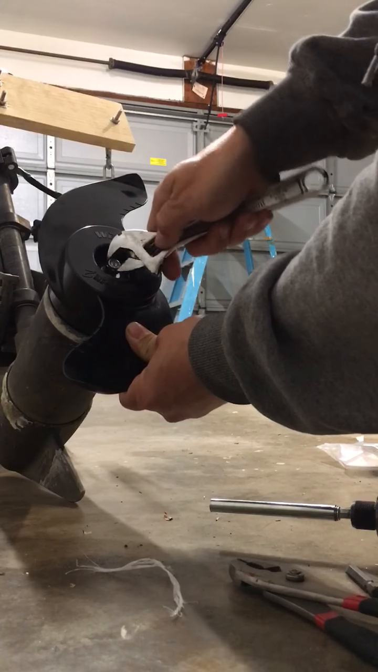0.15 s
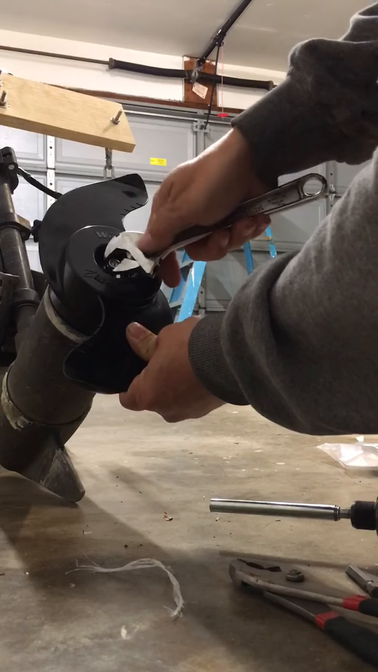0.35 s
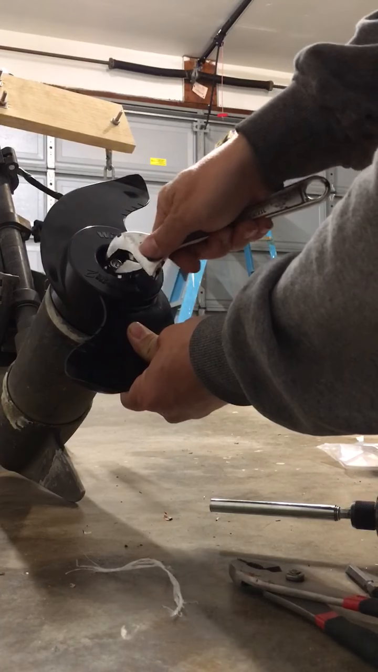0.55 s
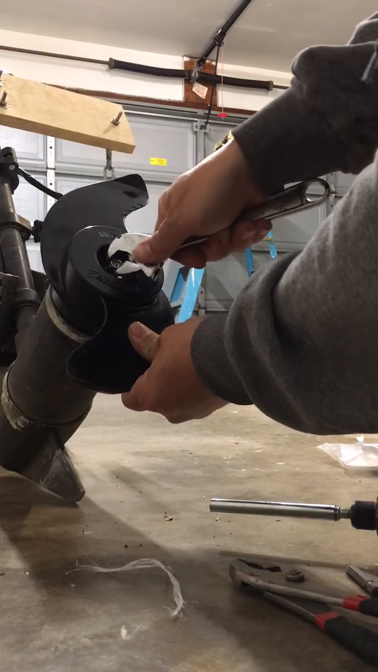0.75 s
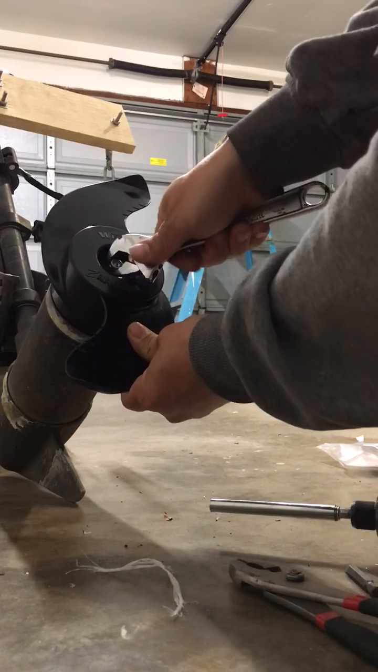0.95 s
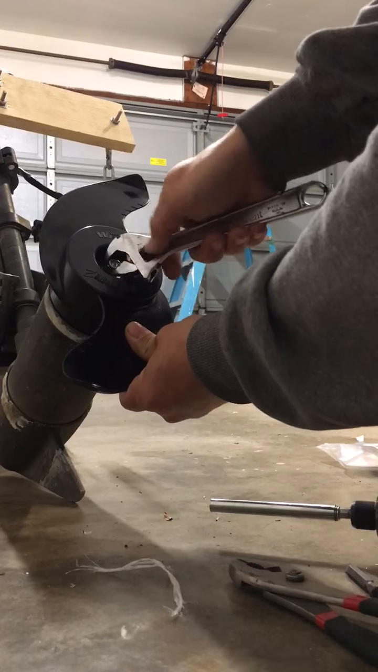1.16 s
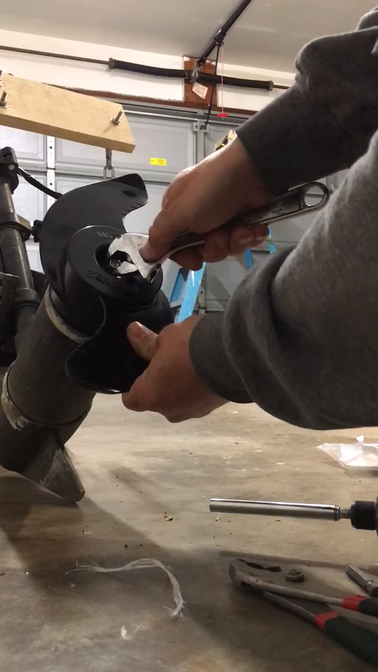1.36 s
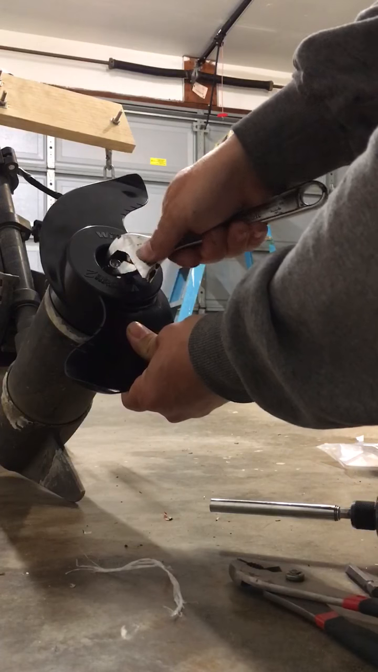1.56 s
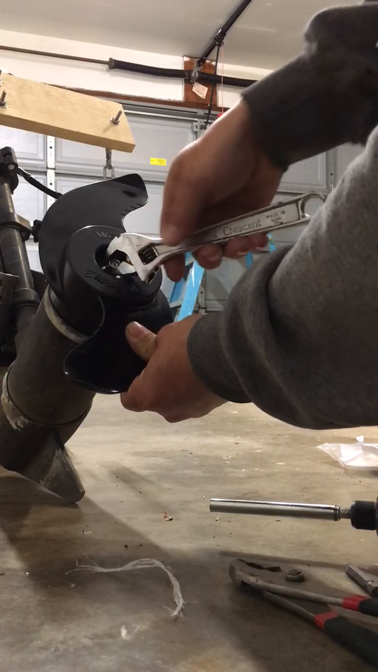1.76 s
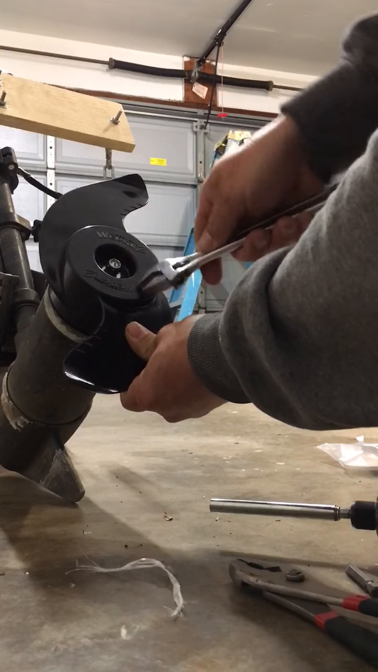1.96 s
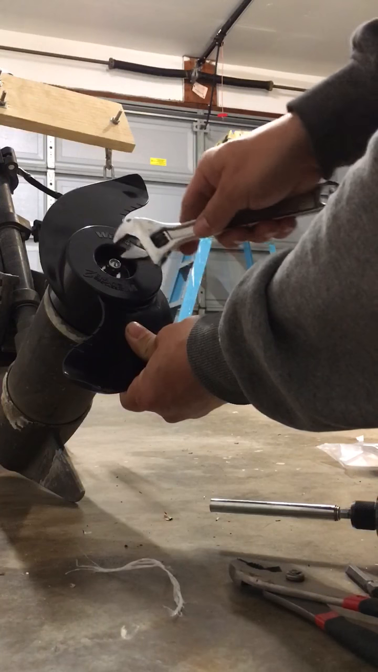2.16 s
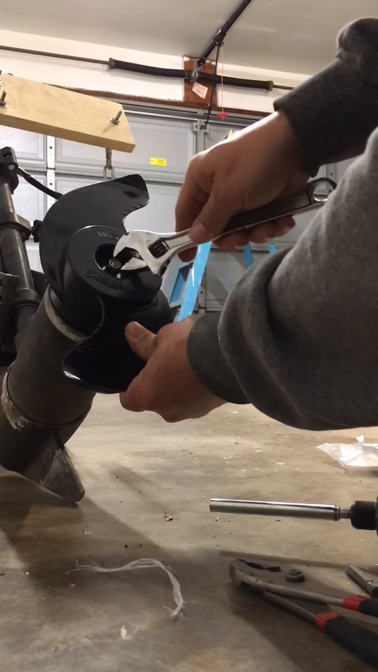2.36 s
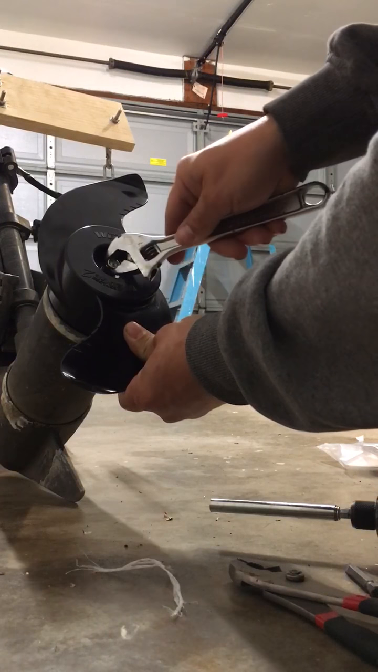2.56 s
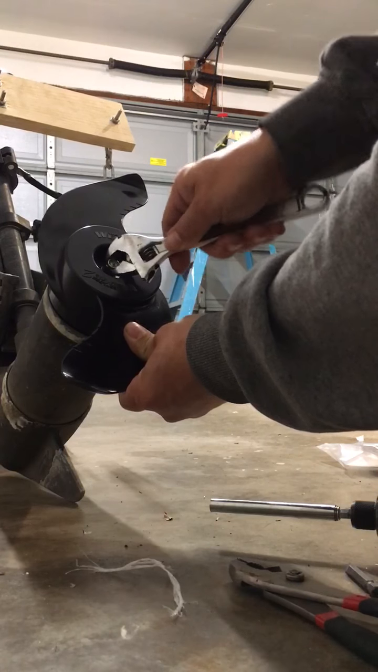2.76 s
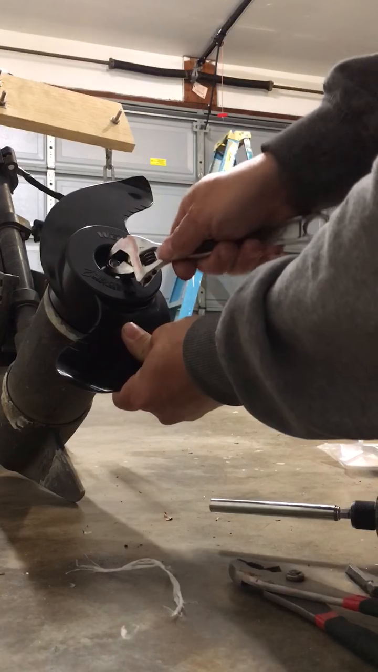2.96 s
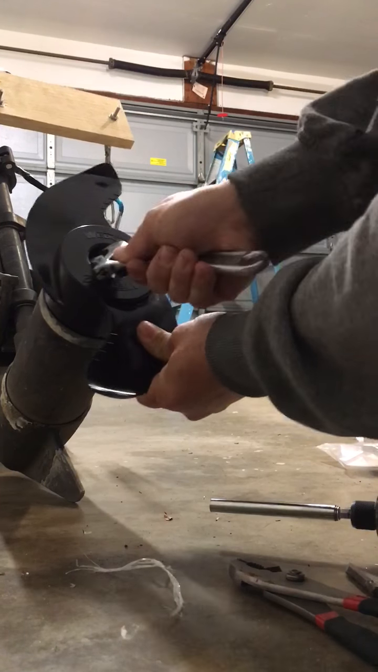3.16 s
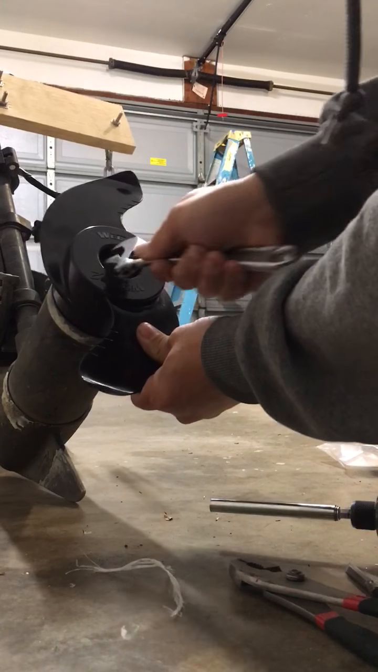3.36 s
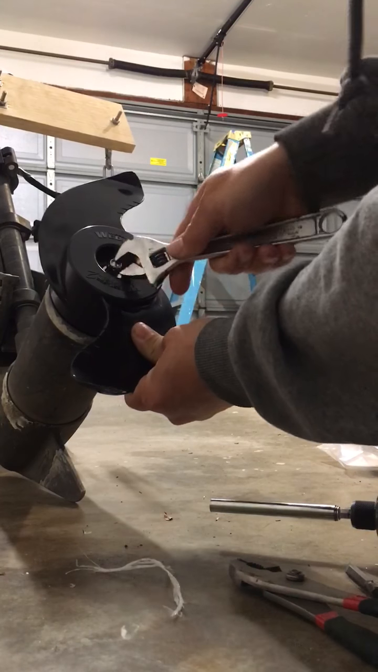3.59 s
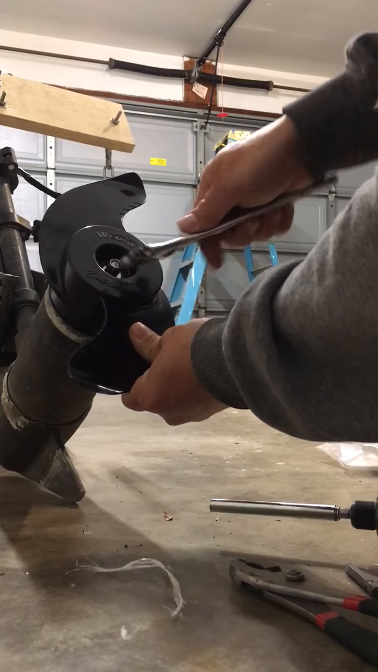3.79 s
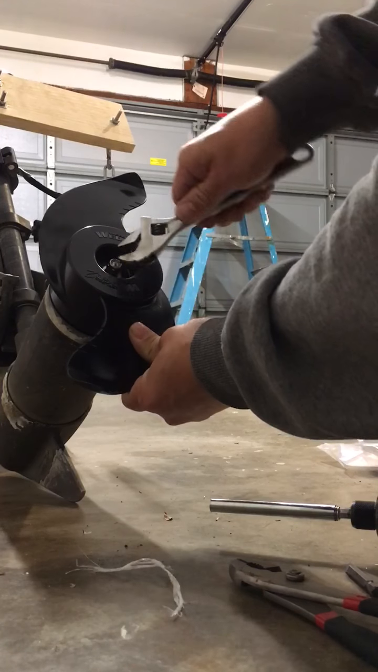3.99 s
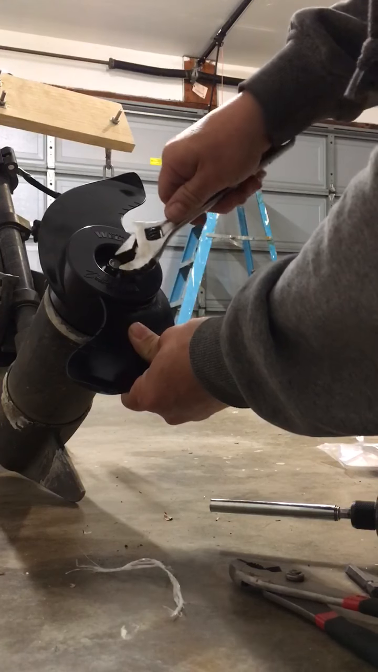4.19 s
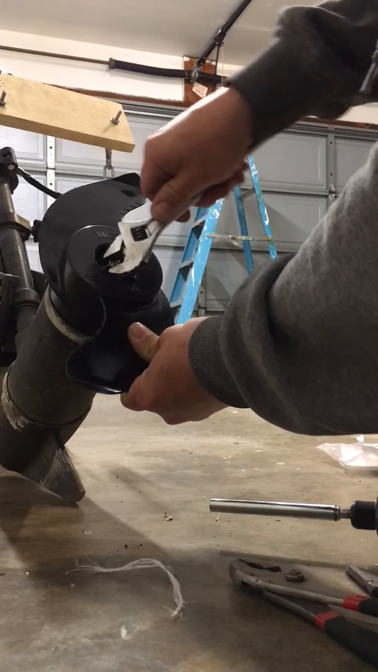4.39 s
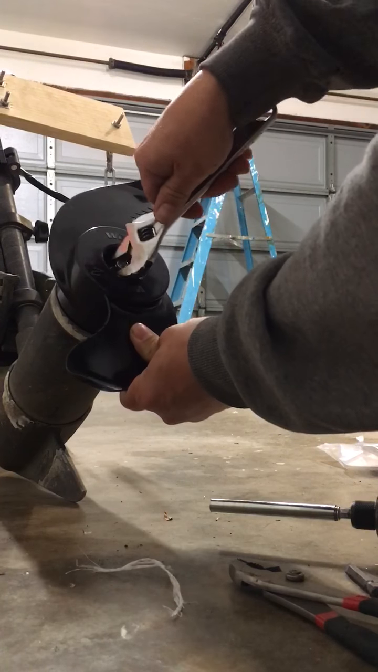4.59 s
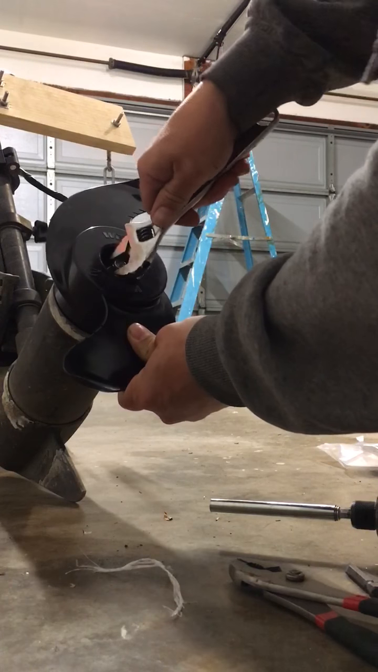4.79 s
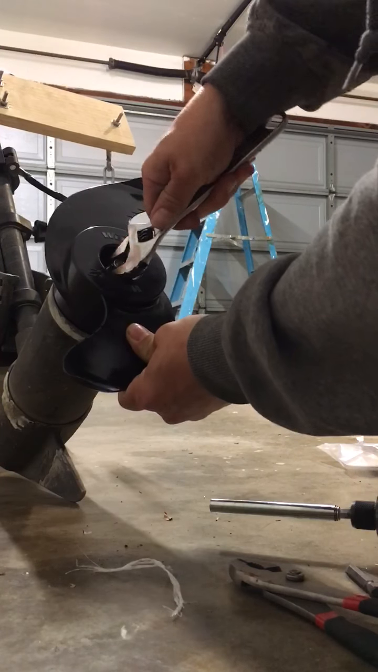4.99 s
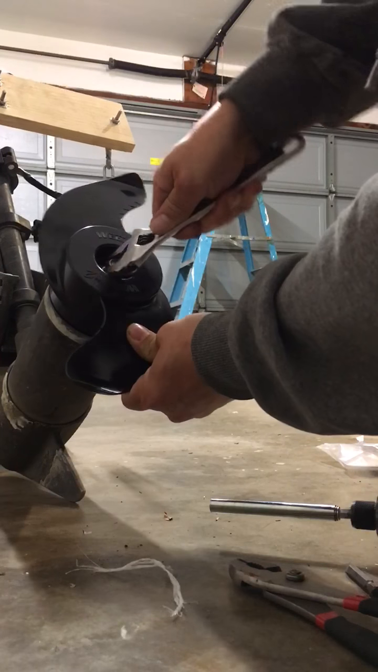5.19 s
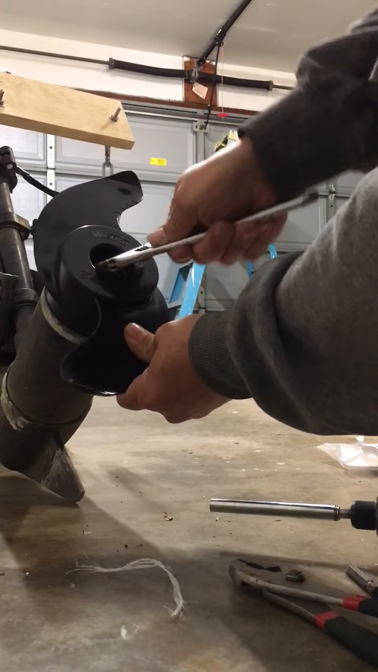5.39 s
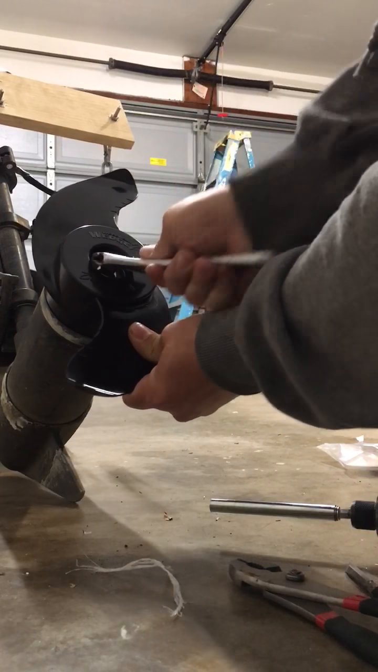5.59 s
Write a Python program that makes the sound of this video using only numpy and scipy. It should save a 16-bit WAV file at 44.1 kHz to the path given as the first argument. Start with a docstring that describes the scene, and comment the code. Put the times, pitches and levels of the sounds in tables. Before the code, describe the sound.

Over a constant low hum, a steel wrench ticks softly against a nut, then clinks and knocks in uneven bursts that make a boat motor boom dully and echo around a hard garage. Just past the middle the wrench slips with a sharp scrape among small steel pings. The knocks continue, then thin out, and a faint metal slide and brush of cloth end it.

```python
"""An adjustable wrench is worked on the nut of a boat propeller in a garage where a machine hums.
At first the jaws click lightly and a small loose steel part pings. From about 2 s harder blows come in
clusters: each rings the wrench, knocks the propeller and makes the motor leg boom, and the hard room
answers. Near 3.2 s the jaws slip with a loud scrape. The blows die away before 5 s, and a faint slide
and the brush of a sleeve close the scene over the hum."""
import sys
import numpy as np
from scipy import signal
from scipy.fft import rfft, irfft
from scipy.io import wavfile

SR = 44100
rng = np.random.default_rng(int(sys.argv[2]) if len(sys.argv) > 2 else 0)


def wrap_up_sound(samples):
    """Save the sound to the file named by the first command line argument, as 16-bit audio."""
    columns = np.atleast_2d(samples).T
    # keep every value between -1 and 1, then stretch to whole-number steps
    tamed = np.clip(columns, -1, 1)
    steps = np.round(tamed * 32767).astype(np.int16)
    wavfile.write(sys.argv[1], SR, steps)


N = 248677
T = np.arange(N) / SR

# Modes of the wrench: those of the handle, and the bright ring above them.
# Each row: frequency in Hz, relative level in dB, t60 (time to fall 60 dB) in seconds.
HANDLE_MODES = [(3343, -11.5, 0.023), (3760, -12.5, 0.032), (3713, -9, 0.0088), (4000, -9.5, .012)]
BRIGHT_MODES = [(5010, -12.5, 0.016), (5610, 3.5, 0.0071), (6070, -4.5, 0.0042), (6310, -3, 0.017),
                (6800, -2.5, 0.0064), (7400, -12, 0.022), (8060, -10, 0.01), (8500, -13.5, 0.026),
                (9560, -11, .009)]
DETUNE = .025  # relative scatter of the mode frequencies from contact to contact


def amp(db):
    """Amplitude grows tenfold with every 20 dB."""
    return 10 ** (np.asarray(db) / 20)


def unit_rms(x):
    """Power normalisation: scales a sustained sound to rms 1."""
    return x / np.sqrt(np.mean(x ** 2) + 1e-20)


def burst(x):
    """Energy normalisation: gives a transient the energy of 10 ms at rms 1."""
    return x * np.sqrt(.01 * SR / (np.sum(x ** 2) + 1e-20))


def value_at(points, hz):
    """Interpolation of a curve on a logarithmic frequency axis."""
    point_hz, value = np.transpose(points)
    return np.interp(np.log(hz + 1), np.log(point_hz + 1), value)


def add(mix, start_s, sound):
    """Superposition: a sound adds to the mix from its start time on."""
    part = mix[round(start_s * SR):][:len(sound)]
    part += sound[:len(part)]


def colour(x, spectrum):
    """Linear filtering by a curve whose points give frequency in Hz and gain in dB."""
    gain = amp(value_at(spectrum, np.fft.rfftfreq(len(x), 1 / SR)))
    return irfft(rfft(x) * gain, len(x))


def fade(x, decays, size=256):
    """Frequency-dependent damping: each band decays exponentially with its own t60."""
    hz, t, bands = signal.stft(x, SR, nperseg=size)
    decay = amp(-60 * t / value_at(decays, hz)[:, None])
    return signal.istft(bands * decay, SR, nperseg=size)[1][:len(x)]


def ring(modes, detune=0):
    """Free vibration is a sum of damped sines; grip and contact point vary their weights and pitch."""
    hz, db, t60 = np.transpose(modes)[:, :, None]
    weight, shift = rng.standard_normal((2, len(modes), 1))
    t = T[:int(SR * min(t60.max() + .02, 1))]
    sign = (-1) ** np.arange(len(modes))[:, None]  # neighbouring modes swing against each other
    envelopes = amp(db + 2 * weight - 60 * t / t60)
    sines = np.sin(2 * np.pi * hz * (1 + detune * shift) * t)
    # a small body radiates little below its lowest mode
    radiation = signal.butter(2, 0.32 * hz.min(), "high", fs=SR, output="sos")
    return signal.sosfilt(radiation, (sign * envelopes * sines).sum(0))


def contact(chatter_s, size=1024):
    """Tiny rebounds spread a contact force in time, yet its spectrum stays nearly flat."""
    progress = T[:size] / max(chatter_s, 1 / SR)
    envelope = progress ** .25 * np.exp(-1.4 * progress)
    force = rng.standard_normal(size) * envelope
    for _ in range(2):  # flatten the spectrum, then confine the force in time again
        spectrum = rfft(force)
        force = irfft(spectrum / (abs(spectrum) + 1e-12)) * envelope ** .25
    return force


def strike(modes, chatter_s, detune=0):
    """A struck body responds with its free vibration convolved with the contact force."""
    return burst(signal.fftconvolve(ring(modes, detune), contact(chatter_s)))


def friction(spectrum, grain_db, grains_per_s):
    """Friction noise: small uneven slips modulate the level of a broadband hiss."""
    slips = np.interp(T * grains_per_s, np.arange(N), rng.standard_normal(N))
    return unit_rms(colour(rng.standard_normal(N) * amp(grain_db * slips), spectrum))


def strokes(table, range_db=27):
    """Rubbing follows pressure: a stroke gains range_db over its swell and loses it over its release."""
    gain = np.zeros(N)
    for start_s, swell_s, release_s, peak_db in table:
        past_peak = T - start_s - swell_s
        gain += amp(peak_db - range_db * np.maximum(-past_peak / swell_s, past_peak / release_s))
    return gain


def machine_hum(air_db=-51, waver=0.029):
    """Periodic forces of mains and shaft give a line spectrum, wavering over the rush of moving air."""
    # The machine's tones. Each row: frequency in Hz, rms level in dB.
    tones = [(57.4, -48.5), (120, -46), (240, -55.5), (399, -67.5), (572, -70), (692, -67.5), (705, -75.5)]
    # Air noise. Each row: frequency in Hz, relative spectral density in dB.
    air_spectrum = [(20, -29.5), (40, -5.5), (70, 5), (100, -11.5), (150, 2), (210, -4.5), (320, -13),
                    (400, -5), (480, -14), (680, -16), (1050, -16.5), (1250, -26), (1550, -19.5),
                    (1850, -32.5), (2200, -27), (2700, -33.5), (4300, -36.5), (5000, -42), (9000, -46.5),
                    (10500, -48.5), (16500, -49.5), (19000, -53)]
    out = amp(air_db) * unit_rms(colour(rng.standard_normal(N), air_spectrum))
    for hz, db in tones:
        swell, drift = (np.interp(T * 5, np.arange(99), row) for row in rng.standard_normal((2, 99)))
        phase = 2 * np.pi * (hz * T + rng.random()) + waver * drift
        out += amp(db) * np.sqrt(2) * (1 + waver * swell) * np.sin(phase)
    return out


def garage(x, early_db=-17):
    """Reverberation: early reflections off floor and hull give way to a dense, diffuse tail."""
    # Reverberation time. Each row: frequency in Hz, t60 in seconds.
    decays = [(100, 6.5), (300, 2.3), (800, 0.75), (1600, 0.826), (4000, 0.87), (8000, 0.6), (12000, 0.55),
              (17000, 0.6)]
    # Colour of the tail. Each row: frequency in Hz, relative level in dB.
    tail_spectrum = [(200, -8), (500, -14), (800, -9.5), (1500, -4.5), (2300, -10), (3700, -17),
                     (6000, -13.5), (9000, -12.5), (15000, -22.5)]
    early, late = rng.standard_normal((2, SR))
    since = np.maximum(T[:SR] - .003, 0)  # the first reflection arrives after 3 ms
    early = unit_rms(early * (since > 0) * np.exp(-since / 0.0044)) / np.sqrt(SR)
    build_up = 1 - np.exp(-since / 0.0023)
    late = colour(fade(late * build_up, decays), tail_spectrum) / np.sqrt(0.055 * SR)
    return signal.fftconvolve(x, amp(early_db) * early + late)[:N]


def sleeve(rustle_db=-83):
    """Cloth friction: a faint steady rustle swells with each move of the arm."""
    # Cloth noise. Each row: frequency in Hz, relative spectral density in dB.
    cloth_spectrum = [(300, -10), (1500, 3), (3000, -3), (4900, -9), (6400, -1), (10000, -9), (14000, -14),
                      (18000, -26)]
    # Arm movements. Each row: start, swell and release in seconds, peak level in dB.
    brushes = [(0, 0.29, 0.47, -77), (1.4, 0.66, 0.29, -77.5), (3.75, 0.21, 0.4, -71.5),
               (5.1, 0.5, 0.36, -65.5)]
    cloth = friction(cloth_spectrum, grain_db=4, grains_per_s=120)
    return (amp(rustle_db) + strokes(brushes)) * cloth


def jaw_ticks(ticks_per_s=3, level_db=-74.5):
    """Backlash: play in the jaws gives faint random impulses that ring the wrench."""
    taps = (rng.random(N) < ticks_per_s / SR) * rng.random(N)
    tick = burst(ring(HANDLE_MODES + BRIGHT_MODES))
    return amp(level_db) * signal.oaconvolve(taps, tick)[:N]


def steel_pings():
    """A small body has high natural frequencies: a loose steel part pings when flicked."""
    # The flicks. Each row: start in seconds, relative level in dB.
    flicks = [(.422, -55), (.683, -66), (2.829, -45), (3.036, -60), (3.228, -44), (3.486, -49),
              (3.938, -51.5)]
    # The part's modes. Each row: frequency in Hz, relative level in dB, t60 in seconds.
    part_modes = [(3250, -5, .012), (5920, -8, .025), (8970, -5, .035), (11900, -2, .026), (12150, -6, .01)]
    out = np.zeros(N)
    for start_s, db in flicks:
        add(out, start_s, amp(db) * strike(part_modes, chatter_s=.002))
    return out


def jaw_scrape(slips_per_s=650, spread_db=5, pressed_t60_share=.3):
    """Stick-slip friction: each slip of the jaws rings the wrench, damped by the pressure on the nut."""
    # Slides on the nut. Each row: start, swell and release in seconds, relative peak level in dB.
    slides = [(-.05, 0.036, .4, -66), (1.72, 0.32, 0.07, -51.5), (2.98, 0.22, .04, -50.5),
              (3.17, 0.0323, 0.018, -22.5), (4.41, 0.064, 0.11, -53.5), (5.1, 0.27, 0.74, -71),
              (5.2, 0.41, 0.55, -67)]
    # Dry grit. Each row: frequency in Hz, relative spectral density in dB.
    grit_spectrum = [(600, -22), (1600, 12.5), (2000, -6.5), (2900, -3), (3550, -10), (4100, -9.5),
                     (4900, -22), (5600, 6), (6300, -10), (7000, -16.5), (8100, -18), (10500, -23.5),
                     (11700, -4.5), (17000, -23)]
    onsets = rng.random(N) < slips_per_s / SR
    slips = onsets * amp(spread_db * np.clip(rng.standard_normal(N), -2, 2))
    ringing = np.zeros(N)
    for modes, db in [(HANDLE_MODES, -3.5), (BRIGHT_MODES, -9.5)]:
        damped = np.array(modes) * [1, 1, pressed_t60_share]
        ringing += amp(db) * unit_rms(signal.oaconvolve(slips, ring(damped, DETUNE))[:N])
    grit = friction(grit_spectrum, grain_db=6, grains_per_s=160)
    return strokes(slides) * (ringing + amp(-5) * grit)


def leg_boom(rise_s=0.0015):
    """Structure-borne sound: the motor leg and its stand rumble after a blow, the lowest modes longest."""
    # The rumble. Each row: frequency in Hz, relative spectral density in dB.
    rumble_spectrum = [(30, -35), (60, -5.5), (95, -5), (120, -5), (140, 1), (180, -7), (230, -10.5),
                       (290, -5.5), (350, -16.5), (480, -13.5), (650, -12.5), (1200, -47.5)]
    # Damping of leg and stand. Each row: frequency in Hz, t60 in seconds.
    decays = [(80, 0.96), (145, 0.84), (250, 0.35), (500, .14)]
    rumble = fade(colour(rng.standard_normal(SR), rumble_spectrum), decays, size=1024)
    return burst(rumble * (1 - np.exp(-T[:SR] / rise_s)))


def shank_clink(centre_hz, chatter_s, octaves_per_6_db=0.21):
    """Selective excitation: the free shank resonates in the narrow band that a blow drives."""
    # The shank's modes. Each row: frequency in Hz, relative level in dB, t60 in seconds.
    shank_modes = [(1470, -2, .06), (1550, 0, .1), (1620, -4, .06), (2020, -3, .06), (2110, 0, .06),
                   (3660, 0, .05), (3760, -4, .03), (5600, -3, .03), (5950, 0, .05), (6210, -4, .03),
                   (8290, -2, .02), (8460, 0, .035), (8640, -3, .015)]
    excited = [(hz, db - 6 * abs(np.log2(hz / centre_hz)) / octaves_per_6_db, t60)
               for hz, db, t60 in shank_modes]
    return strike(excited, chatter_s, detune=.012)


def crack(force, band_db):
    """Modal overlap: dense weak modes merge into a crack that follows the blow's level in each band."""
    centre_hz = [800, 1900, 3700, 7000, 13000]
    width_hz = np.array([900, 1500, 1500, 4500, 7000])
    density_db = np.array(band_db) - 10 * np.log10(width_hz / (SR / 2))
    spectrum = [(100, density_db[0] - 25), *zip(centre_hz, density_db), (18000, density_db[-1] - 8)]
    return colour(burst(np.pad(force, (40, 1000))), spectrum)


def steel_levels(strength_db, hardness):
    """Spectral tilt: a hard contact favours the high modes of the wrench, a soft one the low."""
    # Bands of jaw, handle, bright ring and snap. Each entry: centre frequency in Hz.
    centre_hz = [1850, 3700, 7000, 13000]
    # The steel's response to an even blow. Each entry: relative level of that band in dB.
    response_db = [-1.24, -0.56, -2.2, -1.7]
    return strength_db + np.array(response_db) + hardness * np.log2(np.array(centre_hz) / centre_hz[1])


def wrench_blows(even_chatter_s=0.00126, boom_over_jaw_db=6, boom_limit_db=-28.5):
    """Impact excitation: each blow on the nut drives the modes of wrench, propeller and motor leg."""
    # The blows. Each row: start in seconds, strength in dB, hardness in dB per octave, propeller knock
    # in dB, jaw pitch in Hz, shank ring in dB, centre of the shank's band in Hz.
    blows = [(.3145, -57.5, -5, -50, 1450, -68, 1550), (.775, -75, -2, -71, 2300, -65.5, 3600),
             (.857, -79, -1, -54, 1390, -80, 1500), (1.099, -74, 0.5, -68, 2500, -78, 3900),
             (1.3105, -58.5, -2, -53.5, 2500, -57, 1480), (1.736, -69, -3.5, -60.5, 2390, -77, 3700),
             (1.813, -67, -7.5, -59.5, 1560, -67, 5600), (1.948, -62, -5, -49.5, 1530, -60, 5600),
             (1.984, -55.5, -11.5, -37.5, 2182, -53, 1550), (2.011, -40, 11, -29, 2230, -34.5, 2050),
             (2.0125, -32, 1.5, -25, 2150, -31.5, 6070), (2.032, -46, 5, -28.5, 1350, -42, 3710),
             (2.283, -46.5, -5, -26.5, 1230, -47, 2006), (2.335, -38, 4.5, -38, 1950, -47.5, 3700),
             (2.353, -41.5, -8, -52, 2430, -39, 1550), (2.368, -28.5, -2.5, -32.5, 2200, -28, 7040),
             (2.4175, -38.5, 1.5, -29.5, 1400, -33.5, 8200), (3.130, -57, -6, -47, 1430, -48.5, 3700),
             (3.179, -47, -10, -39, 1150, -52, 3700), (3.1885, -36, -3, -43, 1380, -51, 3700),
             (3.198, -34, -4, -44, 1120, -27.5, 3600), (3.202, -40.5, -5.5, -43.5, 1650, -31, 3560),
             (3.2072, -32.5, -12, -22.5, 1475, -31, 1460), (3.223, -47.5, -12, -40, 1535, -31.5, 1593),
             (3.410, -44.5, -5, -68, 1550, -41.5, 5500), (3.6014, -32.5, 3, -68, 2350, -27, 3600),
             (3.6035, -39.5, 2, -31.5, 1990, -31, 2170), (3.789, -38, 1.5, -47.5, 2280, -36, 5960),
             (3.826, -62.5, 6.5, -69, 2310, -50.5, 5600), (3.854, -54.5, -4.5, -74, 2100, -51.5, 3400),
             (4.041, -54.5, 0, -79, 2310, -61, 2100), (4.194, -68, -13, -41, 1380, -65, 1490),
             (4.2215, -40.5, -2, -39.5, 2320, -44.5, 5500), (4.284, -56, -10.5, -39, 1450, -35, 1550),
             (4.293, -34.5, 0.5, -35, 1530, -43, 5500), (4.417, -57.5, -7.5, -53, 2660, -66, 3700),
             (4.5007, -41.5, 3, -35, 1210, -47, 5000), (4.7372, -57, -7.5, -37, 1394, -66.5, 3480),
             (4.861, -74.5, -4, -63, 1420, -83.5, 1500)]
    # Modes of the propeller, and of the wrench's high snap.
    # Each row: frequency in Hz, relative level in dB, t60 in seconds.
    propeller_modes = [(620, -7, .012), (795, 0, .03), (885, -2, .017), (1020, -5, .016), (1150, -9, .02),
                       (1330, -13, .016)]
    snap_modes = [(9370, -0.5, 0.0051), (11210, -2, 0.0088), (12100, 7, 0.0027), (13500, -7, 0.0035),
                  (14800, 3.5, 0.0058), (16800, -16, 0.0034)]
    rings, cracks, clinks, booms = np.zeros((4, N))
    # successive cracks alternate between two random room tails, so close blows echo smoothly
    room_cracks = np.zeros((2, N))
    for turn, (start_s, strength_db, hardness, knock_db, jaw_hz, shank_db, shank_hz) in enumerate(blows):
        jaw_modes = [(jaw_hz, 0, .016), (jaw_hz * 1.158, -5, .011), (1540, -14, .02)]
        band_db = [knock_db, *steel_levels(strength_db, hardness)]
        chatter_s = even_chatter_s * 2 ** (-hardness / 16.5)  # a softer contact lasts longer
        for db, modes in zip(band_db, [propeller_modes, jaw_modes, HANDLE_MODES, BRIGHT_MODES, snap_modes]):
            add(rings, start_s, amp(db) * strike(modes, chatter_s, DETUNE))
        add(cracks, start_s, crack(contact(0.6 * chatter_s), band_db))
        # over all directions the spectral notches even out, so a pure impulse drives the room
        add(room_cracks[turn % 2], start_s, crack(np.ones(1), band_db))
        add(clinks, start_s, amp(shank_db) * shank_clink(shank_hz, chatter_s))
        boom_db = min(band_db[1] + boom_over_jaw_db, boom_limit_db)  # the stand gives only so far
        add(booms, start_s, amp(boom_db) * leg_boom())
    return rings, cracks, room_cracks, clinks, booms


def scene():
    """Direct sound, reverberant field, boom and hum superpose in one channel."""
    rings, cracks, room_cracks, clinks, booms = wrench_blows()
    handling = jaw_scrape() + jaw_ticks() + sleeve()
    pings = steel_pings()
    direct = rings + amp(-8) * cracks + amp(0.5) * clinks + amp(-11.5) * pings + handling
    # the ringing's echo is darkened; the cracks supply the room's smooth high wash
    room_rings = colour(rings, [(1500, -4), (6000, -3), (9000, -14.5)])
    into_room = room_rings + clinks + amp(5.5) * pings + handling
    wash = sum(garage(colour(send, [(1500, -2.5), (4500, 1), (9000, 0.5)])) for send in room_cracks)
    return (direct + garage(into_room) + wash + booms + machine_hum())[None]


def record(dry, edge_hz=17600):
    """Band limiting: a linear-phase low-pass removes the highest treble."""
    low_pass = signal.firwin(511, edge_hz, window=("kaiser", 9), fs=SR)
    return signal.oaconvolve(dry, low_pass[None], "same")


dry = scene()
out = record(dry)
wrap_up_sound(out)
```